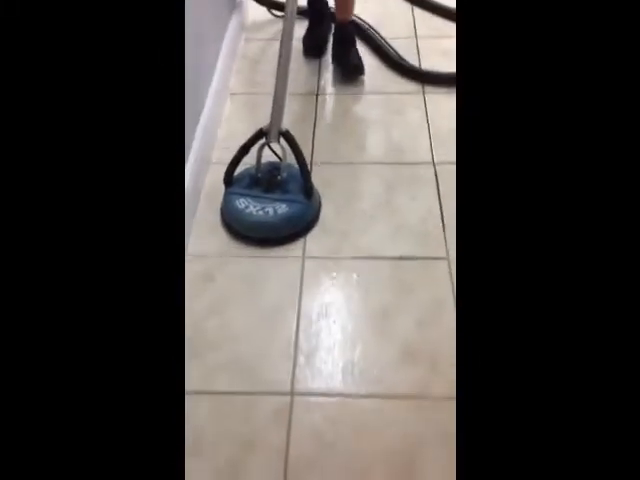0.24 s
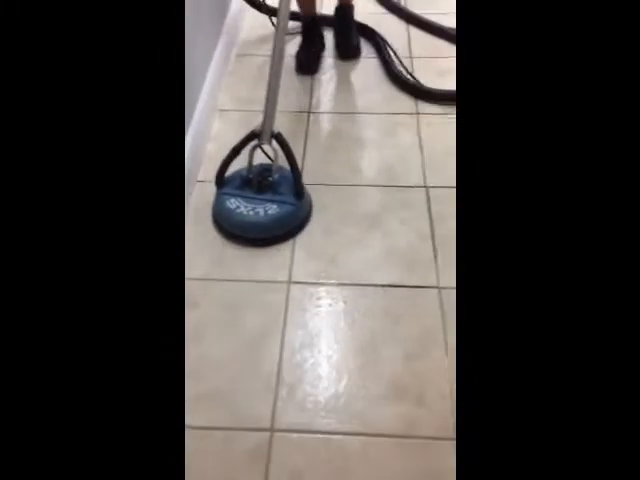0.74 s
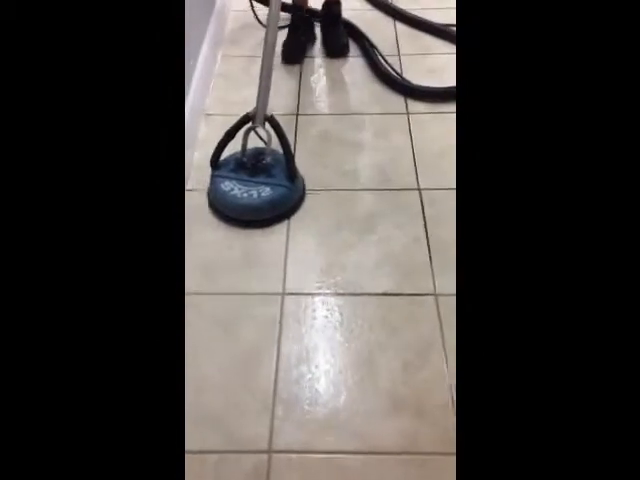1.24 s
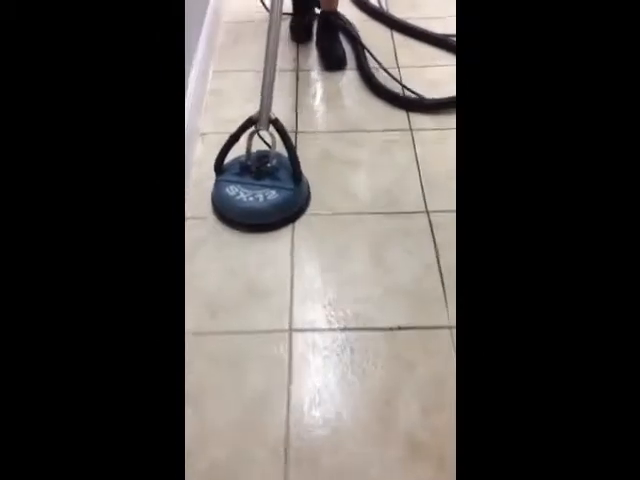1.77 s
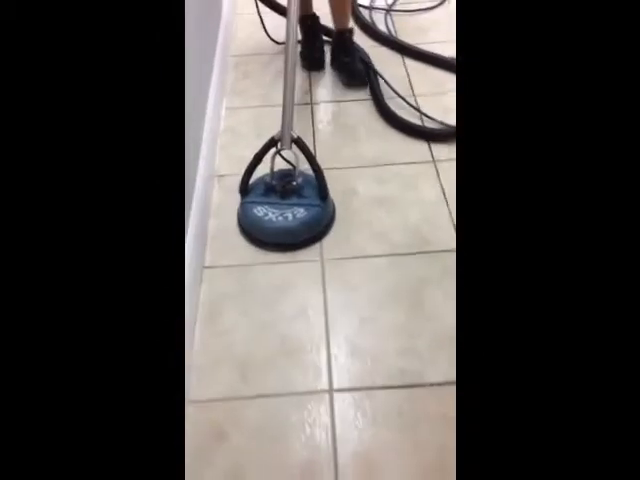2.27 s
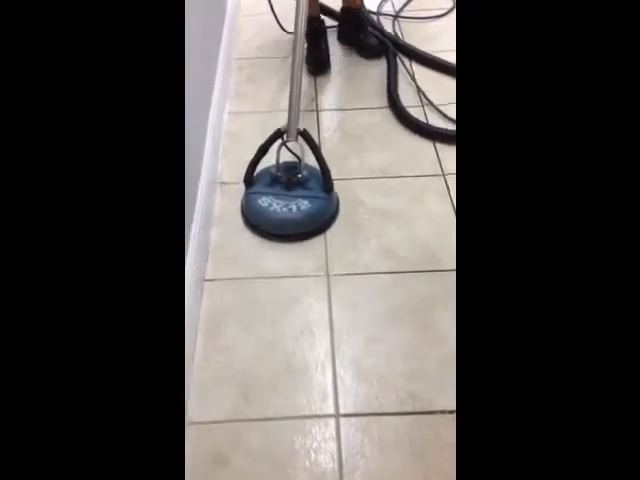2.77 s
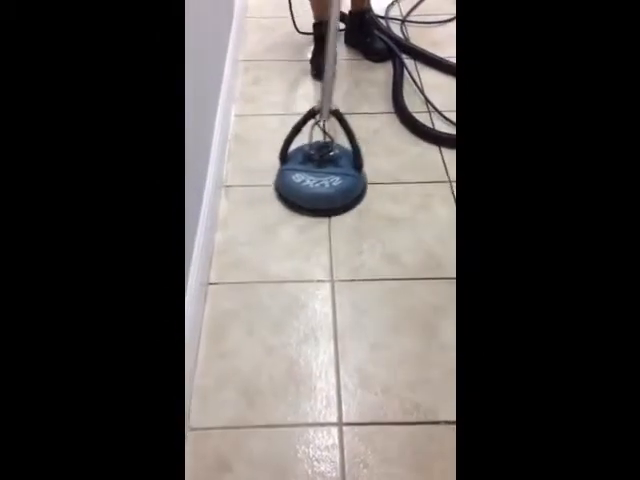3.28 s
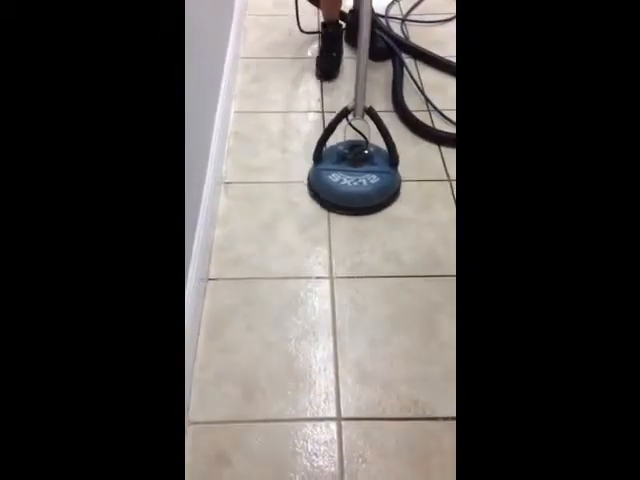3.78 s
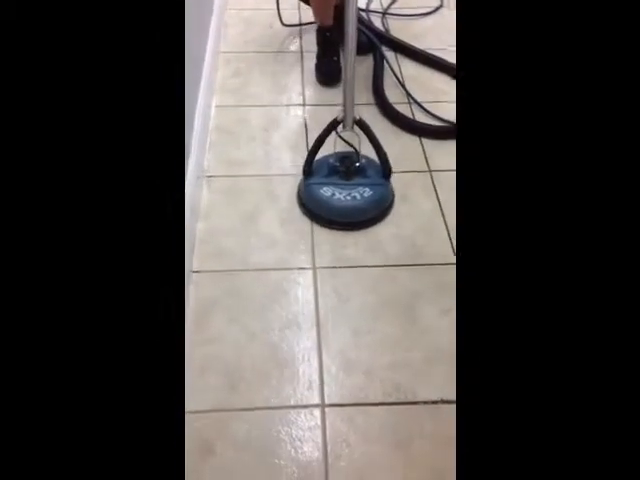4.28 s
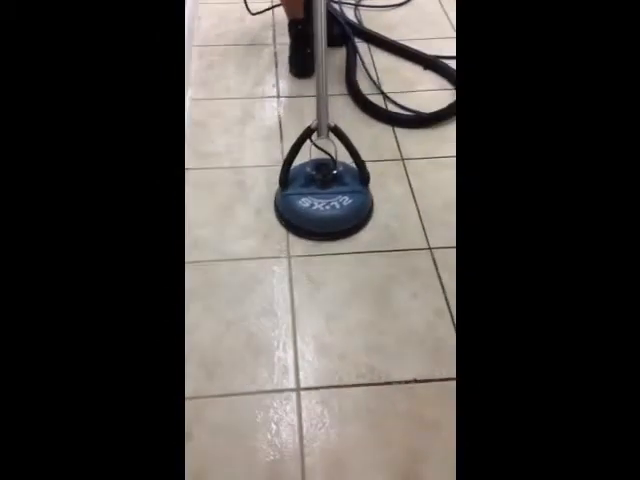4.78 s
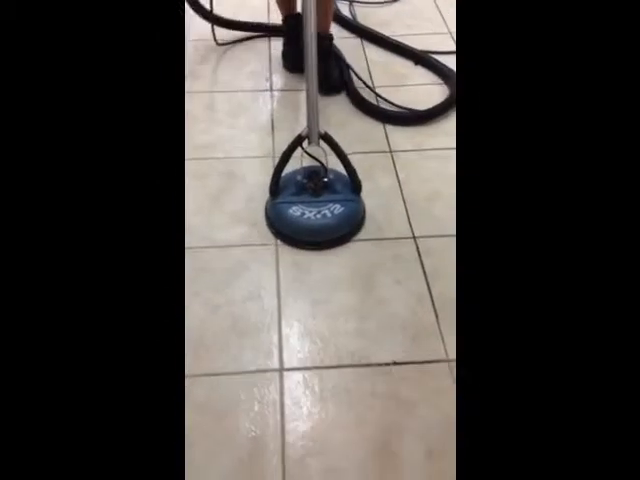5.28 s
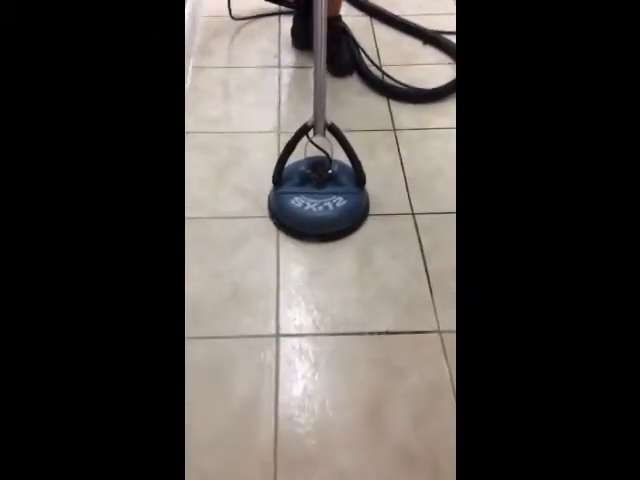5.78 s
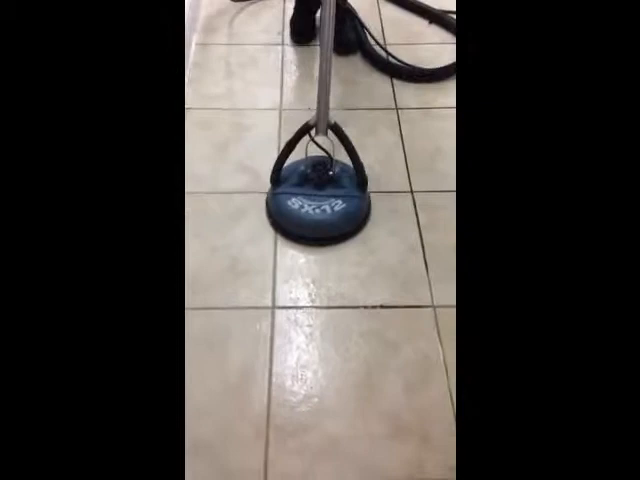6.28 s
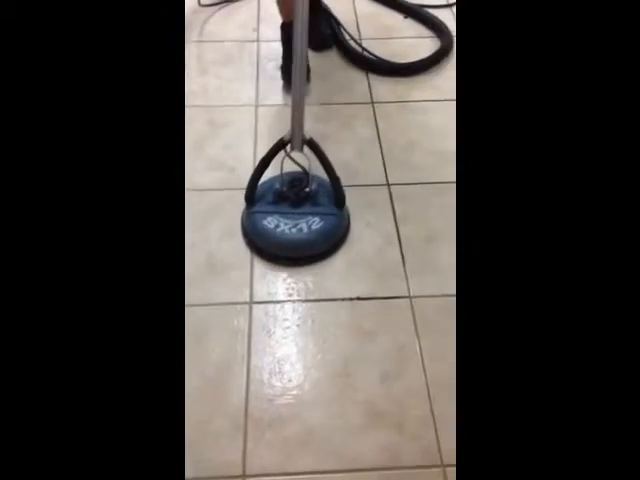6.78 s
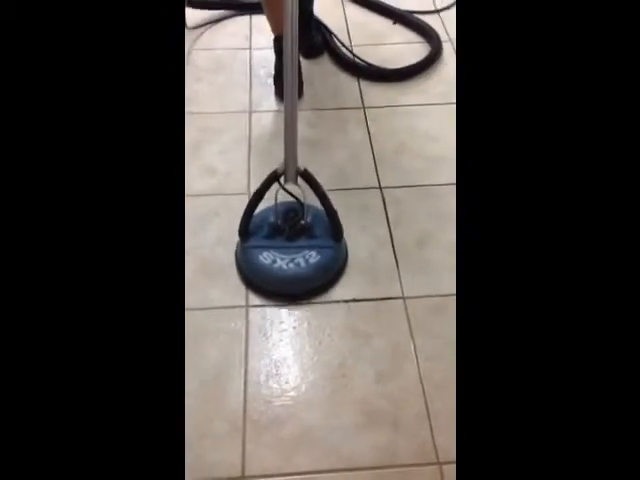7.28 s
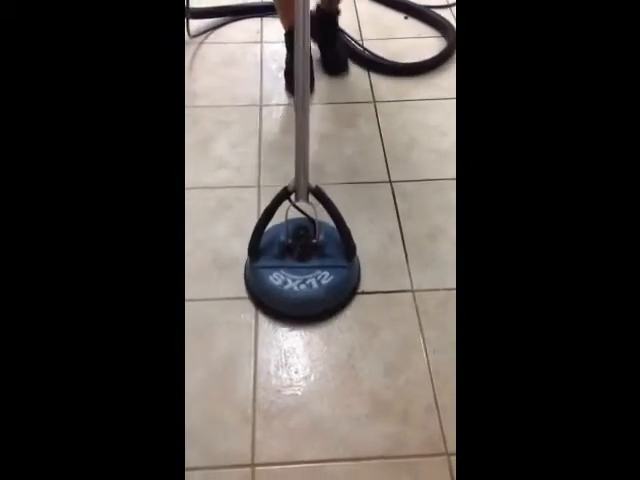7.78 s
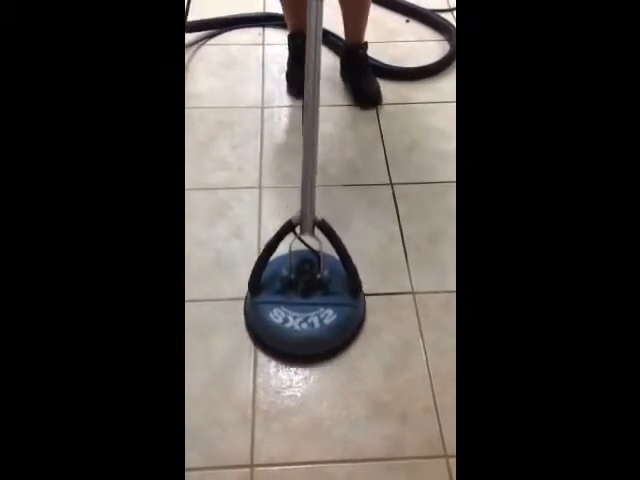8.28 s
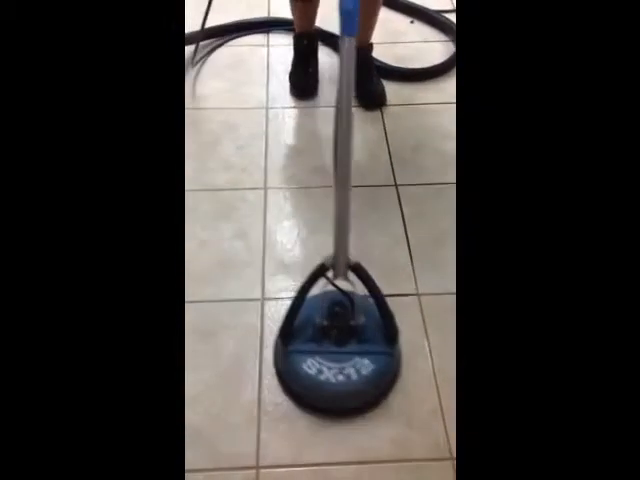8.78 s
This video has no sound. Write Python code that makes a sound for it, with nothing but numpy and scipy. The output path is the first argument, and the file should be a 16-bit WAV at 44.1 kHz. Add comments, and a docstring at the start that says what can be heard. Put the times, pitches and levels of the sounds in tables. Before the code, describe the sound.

A tile floor cleaner sprays and sucks up water with a loud, steady hiss over a faint machine hum.

```python
"""Air and water rush in under the rim of a rotary tile cleaner drawn over a wet hallway floor.
The turbulent inflow excites resonances of rim gap, hood and hose, and air pockets ring in the water.
Hot jets hiss and spatter on the tile, and hard walls return early echoes of rim and jets.
The suction hose drones and a distant blower hums; the head recedes a little, then slowly nears."""
import sys
import numpy as np
from scipy import signal
from scipy.fft import rfft, irfft
from scipy.io import wavfile

SR = 44100
rng = np.random.default_rng(int(sys.argv[2]) if len(sys.argv) > 2 else 0)


def pcm_store(signal):
    """Save signal as 16-bit PCM."""
    levels = np.round(np.clip(np.atleast_2d(signal), -1, 1) * 32767)
    wavfile.write(sys.argv[1], SR, levels.astype(np.int16).T)


N = 398656

# Spectrum of the inrush: f/Hz, relative level/dB
RUSH_SPECTRUM = [(60, -56.5), (300, -46), (950, -16.5), (1400, -10), (1850, -5.5), (2200, -4), (2700, -4),
                 (3100, -3), (3900, -5.5), (4800, -9.5), (6500, -24.5), (10500, -30)]
# Resonances of rim gap and wand: f/Hz, width/Hz, lift/dB
RIM_RESONANCES = [(1570, 64, 4.5), (1694, 80, 5.5), (2000, 190, 4), (2370, 320, 2.3), (2700, 130, 1.6),
                  (4220, 320, 2)]
# Gap hiss, lower in pitch as the seal tightens: f/Hz, width/Hz, level at 1 m/dB, tight-seal gain/dB
GAP_RESONANCES = [(2870, 420, -33.5, 6.5), (3780, 560, -32, 0)]
# Seal of rim on floor: t/s, tightness (-1 leaking, 1 tight), gain of the hollow tones/dB
RIM_SEAL = [(0, -0.73, 2), (1.15, 0.27, 1), (2.3, -0.63, 1), (3.4, -0.87, 0.5), (4.5, -0.51, -2),
            (5.3, 0.2, 0), (6.15, 1, 1), (7.2, 0.84, 1), (9.04, -0.35, -2)]
# Hollow tones of hood and hose that swell or fade with the rim's seal:
# f/Hz, width/Hz, relative level/dB, tight-seal gain/dB
HOLLOW_TONES = [(582, 53, -9.5, -7), (679, 57, -8, 2.5), (780.5, 130, -1.5, 0), (1245, 124, 0.64, 2)]
# Spectrum of the jets: f/Hz, relative level/dB
JET_SPECTRUM = [(100, -51), (1500, -24), (4000, -0.5), (5500, 2.9), (7000, 2.5), (8200, 2.55), (9200, 0),
                (10400, -3.5)]
# Hoots, whistles and slurps: peak t/s, half length/s, f/Hz, width/Hz, nominal level/dB
WHISTLE_EVENTS = [(0.103, 0.06, 227, 120, -35.5), (0.35, 0.25, 2940, 90, -31), (0.74, 0.073, 190, 75, -38),
                  (0.927, 0.042, 2460, 38, -25.5), (1.11, 0.062, 1221, 30, -31),
                  (1.35, 0.13, 2490, 45, -30), (1.853, 0.046, 2026, 23, -25), (2.75, 0.2, 746, 21, -40),
                  (3.387, 0.08, 741, 13, -32.5), (3.65, 0.17, 3580, 440, -29.5),
                  (4.45, 0.35, 2440, 290, -32.5), (4.87, 0.069, 1572, 32, -32),
                  (6.6, 0.15, 2900, 420, -27.5), (8.6, 0.61, 780, 50, -35.5), (8.95, 0.14, 2100, 260, -28)]
# Surges and chokes of the flow: peak t/s, half length/s, rush gain/dB, jet gain/dB
FLOW_SURGES = [(0.46, 0.05, 1.0, 1.2), (0.92, 0.022, 1.5, 2), (1.3, 0.061, 1.0, 1), (3.08, 0.18, -1.5, 0),
               (3.58, 0.07, 0, 0.4), (4.03, 0.037, 1.3, 0), (5.825, 0.04, 0.9, -1), (6.178, 0.054, 2, 2),
               (6.33, 0.063, -0.5, -1.5), (7.49, 0.024, 1, 2.5), (8.1, 0.16, 0.8, 0.5),
               (8.95, 0.053, 0.4, 2.2)]
# Spectrum of the hose flow: f/Hz, relative level/dB
HOSE_SPECTRUM = [(25, -48.5), (50, -25.5), (80, -22.5), (105, -14.5), (135, -1.5), (165, -4.5), (210, 2),
                 (255, 1.5), (300, -2.5), (420, -1.5), (520, -4), (650, -14.5), (1000, -6), (2500, -22.5)]
# Resonances of the hose: f/Hz, width/Hz, lift/dB
HOSE_RESONANCES = [(142, 9.1, 0), (184, 35, 5), (274, 7.2, -3), (382, 62, 4), (670, 57, 11)]
# Blower tones: f/Hz, rms level/dB
BLOWER_TONES = [(184, -47.5), (278, -53), (391, -53), (746.5, -50.5)]
# Path of the cleaning head: t/s, distance from the listener/m
HEAD_PATH = [(0, 1.85), (0.9, 1.85), (2.0, 1.95), (4.5, 2.03), (5.6, 2.07), (7.0, 1.83), (9.04, 1.62)]

RUSH_DB, GURGLE_DB, JETS_DB, HOLLOW_DB, HOSE_DB = -15, -24, -20.5, -30.5, -30.5  # nominal, head at 1 m
JET_DISTANCE_EXPONENT = 0.66  # below 1 because hard walls scatter the hiss


def suction(slurp_db=0.38, flutter_db=1.0, water_db=-8):
    """Turbulence: air tears water through the rim gap; passing slugs modulate each band separately."""
    inflow = noise() + undb(water_db) * drops(rate=1500, spread_db=2.5)
    spectrum = rfft(colour(inflow, RUSH_SPECTRUM, RIM_RESONANCES))
    centres_hz = np.geomspace(1000, 8000, 10)
    rush = 0
    for share in np.eye(len(centres_hz)):
        band = irfft(spectrum * np.interp(bins(), centres_hz, share), N)
        rush = rush + band * undb(flutter_db * walk(rate=24))
    return unit(rush) * undb(slurp_db * walk(rate=20))


def jets(sputter_db=0.83, spatter_db=-7):
    """Jet and impact noise: spinning jets hiss and throw fine droplets against tile and hood."""
    spray = noise() + undb(spatter_db) * drops(rate=2100, spread_db=4.0)
    return colour(spray, JET_SPECTRUM) * undb(sputter_db * walk(rate=26))


def drops(rate, spread_db):
    """Shot noise: droplets strike at random moments, a few much harder than the rest."""
    size = undb(spread_db * np.minimum(rng.exponential(size=N), 5))
    strikes = rng.random(N) < rate / SR
    return unit(strikes * size * np.sign(noise()))


def gurgle(rate=130, low_hz=2000, high_hz=2900, ring_s=0.0031, glide=0.016, spread_db=0.5):
    """Damped oscillation: air pockets open in the water at the rim, ring and slide a little in pitch."""
    out = np.zeros(N + SR)
    t = np.arange(SR // 8) / SR
    age = t / ring_s
    for start, place, slide, size in rng.random((int(rate * N / SR), 4)):
        onset_hz = low_hz * (high_hz / low_hz) ** place
        hz = onset_hz * (1 + glide * (2 * slide - 1) * np.tanh(age / 2))
        pocket = age * np.exp(-age) * np.sin(2 * np.pi * np.cumsum(hz) / SR)
        i = int(start * N)
        out[i:i + len(t)] += pocket * undb(-spread_db * np.log(max(size, .05)))
    return unit(out[:N])


def blown(modes):
    """Forced resonance: airflow drives each mode; the seal favours some and stifles others."""
    tightness, _ = curves(RIM_SEAL)
    return sum(ring(noise(), hz, width) * undb(db + tight_db * tightness)
               for hz, width, db, tight_db in modes)


def hollow_tones():
    """Cavity resonance: the inrush excites the air in hood and hose."""
    _, gain_db = curves(RIM_SEAL)
    return blown(HOLLOW_TONES) * undb(HOLLOW_DB + gain_db)


def whistles():
    """Lock-in: for a moment the inrush feeds a single resonance."""
    out = 0
    for peak_s, half_s, hz, width, db in WHISTLE_EVENTS:
        envelope = swell(peak_s, half_s)
        tone = envelope * ring(noise(), hz, width)
        out = out + tone * undb(db) * np.std(envelope) / np.std(tone)
    return out


def flow():
    """Amplitude modulation: rush and jets surge or choke as the rim rides over the tiles."""
    return undb(sum(np.outer((rush_db, jets_db), swell(peak_s, half_s))
                    for peak_s, half_s, rush_db, jets_db in FLOW_SURGES))


def hose(surge_db=1.05):
    """Duct resonance: wet air surges along the trailing hose and excites its low modes."""
    return colour(noise(), HOSE_SPECTRUM, HOSE_RESONANCES) * undb(surge_db * walk(rate=13))


def blower(wander=0.00599, fading_db=3.0):
    """Rotor tones waver with the blower's load and fade in and out in the hallway's standing waves."""
    rotor_time = np.cumsum(1 + wander * walk(rate=3.9)) / SR
    hum = 0
    for hz, db in BLOWER_TONES:
        fading = undb(fading_db * walk(rate=0.84))
        hum = hum + undb(db) * unit(fading * np.sin(2 * np.pi * hz * rotor_time))
    return hum


def hallway(x, echo_db=-23, sway_s=0.00029, count=4):
    """Comb filtering: floor and wall echoes join the direct sound, their paths shifting with the head."""
    i = np.arange(N)
    delays_s = [lag + sway_s * walk(rate=0.596) for lag in np.geomspace(.003, .013, count)]
    echoes = sum(np.interp(i - SR * delay, i, x, left=0) for delay in delays_s)
    return x + undb(echo_db) * echoes


def colour(x, spectrum, modes=()):
    """Spectral shaping: a broad envelope carries resonant peaks; rms 1."""
    f = bins()
    hz, db = np.transpose(spectrum)
    gain_db = np.interp(np.log(f), np.log(hz), db)
    for centre, width, lift in modes:
        gain_db = gain_db + lift / (1 + (2 * (f - centre) / width) ** 2)
    return unit(irfft(rfft(x) * undb(gain_db), N))


def ring(x, hz, width):
    """Two equal resonators in cascade give steep skirts; rms 1."""
    f = bins()
    detuning = (f / hz - hz / f) * hz / width
    return unit(irfft(rfft(x) / (1 + 1j * detuning) ** 2, N))


def walk(rate):
    """Low-pass noise: a smooth fluctuation with its cutoff at rate Hz; rms 1."""
    f = np.arange(N // 2 + 1) * SR / N
    return unit(irfft(rfft(noise()) / (1 + (f / rate) ** 4), N))


def swell(peak_s, half_s):
    """Gaussian envelope of standard deviation half_s."""
    return np.exp(-((np.arange(N) / SR - peak_s) / half_s) ** 2 / 2)


def noise():
    """White Gaussian noise."""
    return rng.standard_normal(N)


def curves(table):
    """Linear interpolation of a timed table's columns, one value per sample."""
    times, *columns = np.transpose(table)
    return [np.interp(np.arange(N) / SR, times, column) for column in columns]


def bins():
    """Bin frequencies, at least 1 Hz."""
    return np.maximum(np.arange(N // 2 + 1) * SR / N, 1)


def undb(db):
    """Decibels to amplitude ratio."""
    return 10 ** (np.asarray(db) / 20)


def unit(x):
    """Normalisation to rms 1."""
    return x / np.sqrt(np.mean(x ** 2))


def scene():
    """Superposition: head, hose and blower add at one listening point."""
    spreading = 1 / curves(HEAD_PATH)[0]  # inverse-distance law
    rush_gain, jet_gain = flow()
    rim = undb(RUSH_DB) * suction() + undb(GURGLE_DB) * gurgle() + blown(GAP_RESONANCES)
    spray = undb(JETS_DB) * jets()
    head = hallway(spreading * rush_gain * rim + spreading ** JET_DISTANCE_EXPONENT * jet_gain * spray)
    drone = spreading * (hollow_tones() + undb(HOSE_DB) * hose())
    sound = head + drone + whistles() + blower()
    return np.array([sound, sound])


def record(dry, cutoff_hz=10300):
    """Elliptic low-pass filtering cuts off the top treble steeply."""
    return signal.sosfilt(signal.ellip(12, .1, 80, cutoff_hz, fs=SR, output="sos"), dry)


dry = scene()
out = record(dry)
pcm_store(out)
```